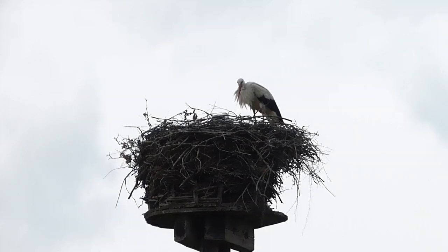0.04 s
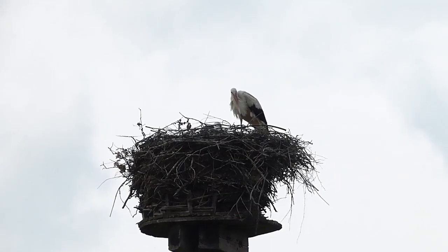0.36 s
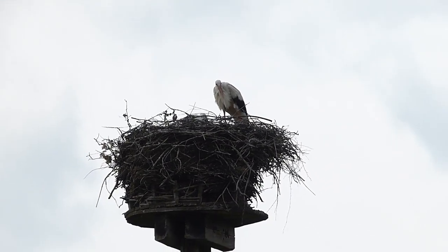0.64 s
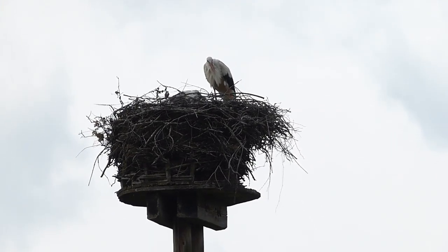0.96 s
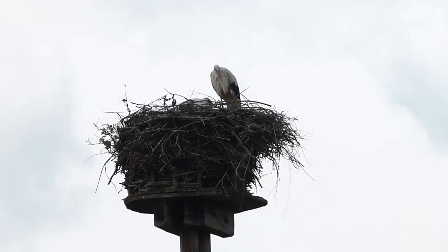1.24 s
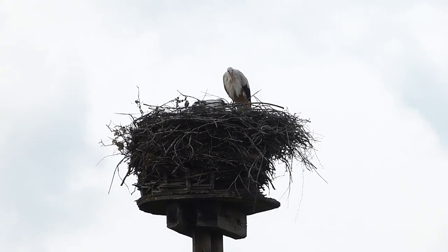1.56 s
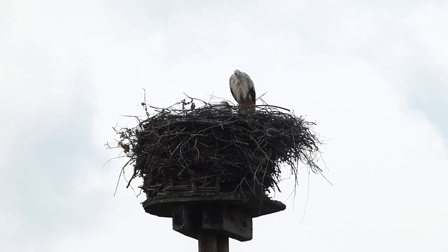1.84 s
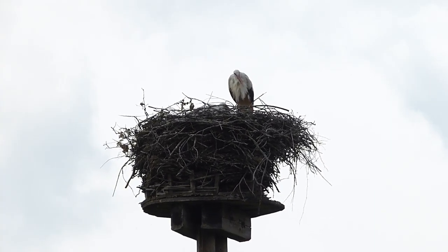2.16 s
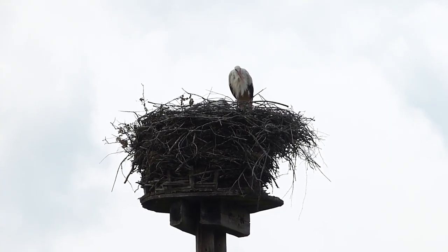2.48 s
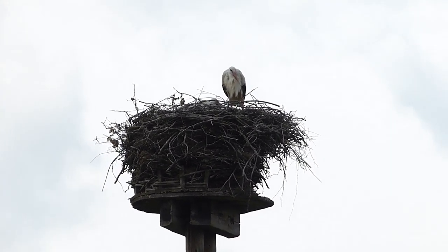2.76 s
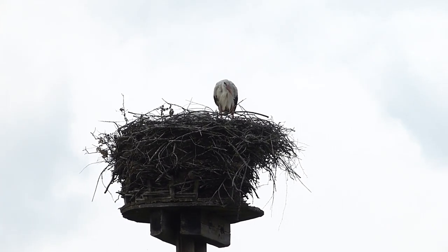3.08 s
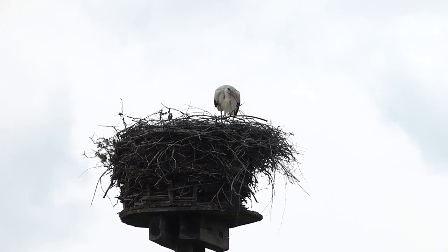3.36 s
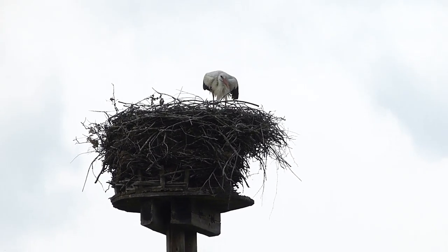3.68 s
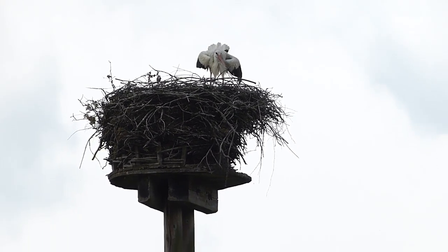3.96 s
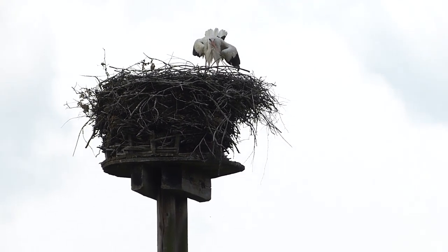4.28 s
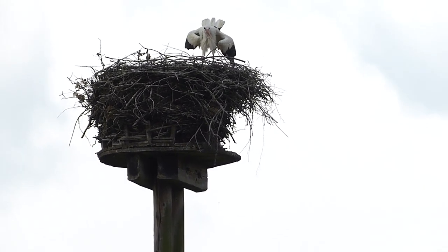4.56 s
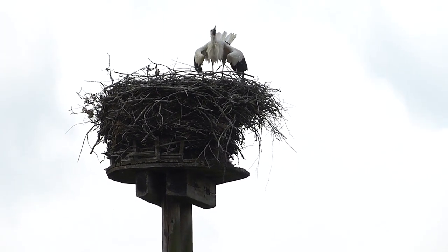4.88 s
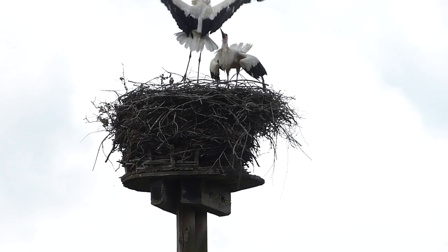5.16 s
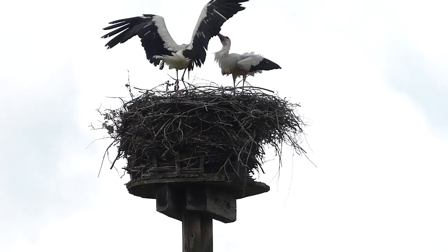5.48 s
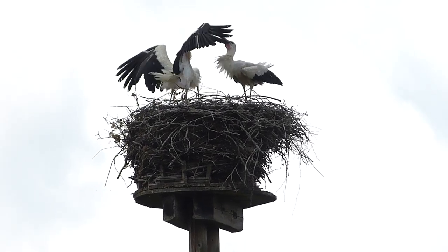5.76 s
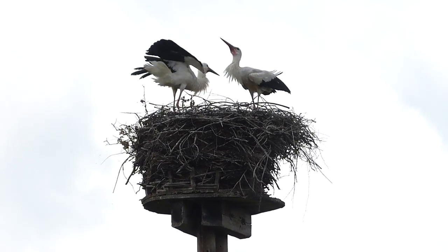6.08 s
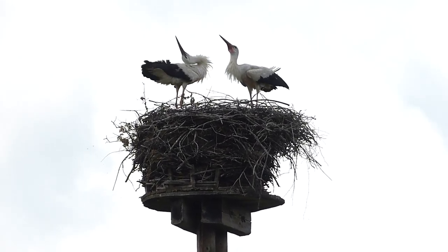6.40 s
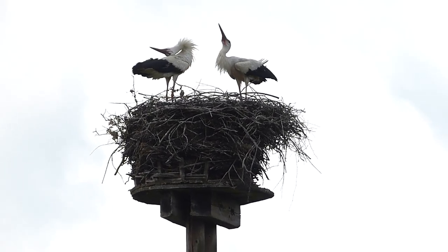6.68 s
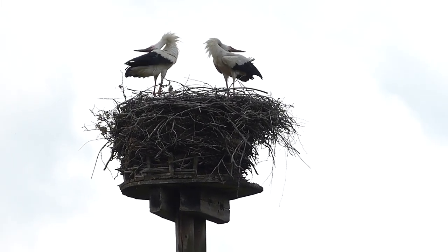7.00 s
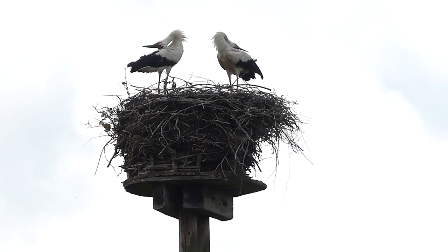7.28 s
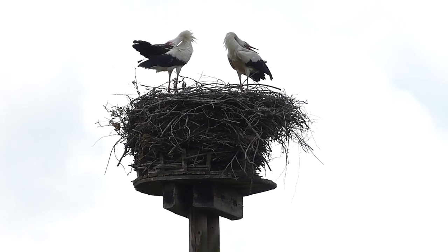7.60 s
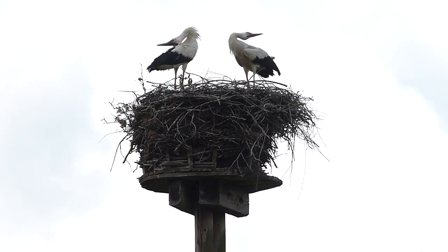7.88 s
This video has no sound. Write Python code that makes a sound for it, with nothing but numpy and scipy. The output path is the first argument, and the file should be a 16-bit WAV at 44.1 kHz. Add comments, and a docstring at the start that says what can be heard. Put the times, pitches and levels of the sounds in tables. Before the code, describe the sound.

Sparrows chirp in a light breeze, then one stork starts clacking its bill and a second joins in, both clattering faster.

```python
"""Two white storks clatter their bills on a pole nest: one claps slowly, its mate glides in, both speed up.
Each clack is a double impact of the mandibles with a rebound; it excites damped resonances of the bill
and throat pouch and is reflected by the ground. Sparrows chirp all around in frequency-modulated tones,
other birds whistle and hoot further off, and a light wind rumbles on the microphone."""
import sys
import numpy as np
from scipy import signal
from scipy.fft import rfft, irfft, next_fast_len
from scipy.io import wavfile
from scipy.ndimage import uniform_filter1d

SR = 44100
rng = np.random.default_rng(int(sys.argv[2]) if len(sys.argv) > 2 else 0)


def pcm_store(signal):
    """Save signal as 16-bit PCM."""
    levels = np.round(np.clip(np.atleast_2d(signal), -1, 1) * 32767)
    wavfile.write(sys.argv[1], SR, levels.astype(np.int16).T)


N = 358974

# Claps of the stork on the nest, 7 a second, then 12: t/s, touch to closure/ms, closure to rebound/ms,
# touch-to-closure force ratio, throat f/Hz, upper resonance f/Hz,
# then level/dB of pouch, throat, upper resonance, horn and crack (energy over 10 ms, before reflections)
HOST_CLAPS = [(3.131, 1.72, 1.4, 0.83, 1450, 2000, -46.5, -37, -43.5, -58, -53.5),
              (3.3949, 1.66, 2.6, 1.8, 1390, 1990, -46, -39.5, -38, -58.0, -58.5),
              (3.5402, 1.59, 1.38, 1.4, 1470, 1880, -44.5, -35.5, -38.5, -43, -55),
              (3.6864, 1.68, 2.5, 1.5, 1440, 1950, -43.5, -35, -38, -40, -47.5),
              (3.8345, 1.7, 2.37, 1.3, 1420, 1910, -47, -37.5, -40, -42.0, -44.5),
              (3.982, 1.63, 2.31, 1, 1500, 1900, -48, -35.5, -43, -41.5, -43.0),
              (4.1266, 1.75, 1.3, 0.53, 1323.0, 1960, -47.5, -39.0, -40.5, -42.0, -41.5),
              (4.2695, 1.62, 2.29, 0.56, 1482.0, 1796.0, -48.5, -39, -44.5, -44.5, -46.5),
              (4.4088, 1.87, 1.14, 2.4, 1330, 1850, -48, -39.5, -48, -50, -46.5),
              (4.5499, 1.8, 1.16, 1.5, 1420, 1850, -46.5, -37.0, -43, -48, -50),
              (4.6859, 1.55, 2.21, 0.98, 1460, 1920, -46, -37, -44, -45.5, -46.5),
              (4.8275, 1.59, 1.57, 0.36, 1440, 2070, -45.5, -36.5, -40.5, -48, -48),
              (4.9692, 1.74, 2.21, 1.1, 1400, 1940, -47.5, -40, -43.5, -44.5, -46),
              (5.1087, 1.48, 1.45, 0.82, 1610, 2110, -43.5, -36.5, -39, -60.0, -47.5),
              (5.2368, 1.53, 1.9, 0.74, 1530, 2184, -43.5, -39.5, -40.5, -47, -46.0),
              (5.3774, 1.57, 1.3, 0.27, 1544, 2130, -45.0, -40.5, -45.0, -58.0, -59),
              (5.5176, 1.4, 1.26, 0.34, 1603.0, 2138.0, -48, -48.5, -56.5, -60, -56.5),
              (5.6826, 1.42, 1.35, 0.16, 1575, 2141.0, -46.5, -39, -45.0, -60.5, -47),
              (5.8166, 1.33, 1.4, 0.14, 1675, 2300, -44.0, -38, -51, -65.0, -52),
              (5.9503, 1.46, 1.33, 0.35, 1645, 2340, -47, -40.5, -41.0, -45, -49.5),
              (6.0712, 1.7, 1.33, 0.29, 1660, 2400, -48.0, -39.5, -39, -67, -48.0),
              (6.1843, 1.7, 1.33, 0.19, 1660, 2340, -49.5, -38, -40.5, -67, -54.5),
              (6.2803, 1.65, 1.25, 0.44, 1660, 2070.0, -53.0, -42.5, -47, -65.0, -52.5),
              (6.3612, 1.23, 1.57, 0.05, 1680, 2215.0, -51.5, -43, -48.5, -67, -50),
              (6.4424, 1.6, 1.4, 0.082, 1760, 2440, -47.5, -39, -41.5, -65.0, -45.5),
              (6.5242, 1.3, 1.1, 0.2, 1670, 2420, -49, -41, -42.5, -65.0, -60),
              (6.6045, 1.39, 1.17, 0.56, 1620, 2300, -47, -39, -40.5, -64.0, -50.5),
              (6.6863, 1.54, 2.3, 0.16, 1550, 2300, -49, -37.5, -37.0, -63.0, -53),
              (6.768, 1.57, 1.38, 0.16, 1594, 2300, -46, -35, -36.5, -65.0, -49.5),
              (6.8508, 1.69, 1.38, 0.17, 1580, 2260, -45.5, -34, -36, -65, -46.5),
              (6.9336, 1.75, 1.4, 0.15, 1562.0, 2270, -48.5, -35.5, -38, -62.5, -46.5),
              (7.0185, 1.74, 1.5, 0.17, 1566, 2243.0, -47, -35, -38.5, -61.5, -45),
              (7.1038, 1.57, 1.37, 0.24, 1570, 2220, -47.5, -36.5, -40, -57.5, -44),
              (7.1887, 1.6, 1.48, 0.17, 1560, 2104.0, -47.5, -37, -43.0, -62.5, -44.5),
              (7.2731, 1.4, 2.02, 0.49, 1640, 2142.0, -48, -35.5, -42, -64.5, -44.5),
              (7.3567, 1.58, 1.37, 0.2, 1580, 2184.0, -47.5, -33.5, -39, -65.0, -43.5),
              (7.4442, 1.5, 1.16, 0.18, 1570, 2090, -46.5, -32.5, -37.0, -59.5, -43.5),
              (7.5363, 1.35, 1.18, 0.14, 1578.0, 2150, -46, -33.0, -38, -65.0, -45.5),
              (7.6281, 1.45, 1.16, 0.14, 1576, 2108.0, -48.5, -34.5, -37.0, -64.5, -44.5),
              (7.7201, 1.5, 2.02, 0.62, 1590, 2280, -46, -38.5, -36.5, -62.5, -39.5),
              (7.8097, 1.8, 1.4, 0.2, 1550, 2297.0, -54.5, -53.5, -60.5, -57, -51),
              (7.9035, 1.6, 1.3, 0.16, 1545, 2170, -49.5, -36.5, -42.5, -67, -46),
              (7.9979, 1.73, 1.3, 0.21, 1560, 2065.0, -49, -35, -41.5, -69, -44.5),
              (8.0953, 1.4, 2.2, 0.29, 1586.0, 2200, -48.5, -35, -42, -60, -44)]
# Its posture as it bows and throws its head back: t/s, pouch f/Hz, cheek f/Hz, cheek level/dB re pouch,
# throat T60/s, upper resonance T60/s, rebound-to-closure force ratio, closure-to-touch crack ratio
HOST_POSTURE = [(3.44, 703, 1033, -3.94, 0.03, 0.022, 0.7, 0.39),
                (4.05, 617.0, 1234, 0, 0.0127, 0.033, 0.4, 1),
                (4.69, 616, 1100, 1.2, 0.028, 0.0216, 0.41, 0.59),
                (5.31, 677, 1020, -14, 0.024, 0.019, 0.34, 0.96),
                (5.94, 660, 847.0, -11, 0.03, 0.0062, 0.5, 0.81),
                (6.48, 703, 835, -16, 0.017, 0.0084, 0.45, 1),
                (7.06, 673, 820, -15, 0.025, 0.0082, 0.33, 0.97),
                (7.769, 715, 810, -4, 0.017, 0.0098, 0.11, 0.73)]
# The mate's claps, 7 to 10 a second, and posture, in the same columns:
# a hollow double knock turns into one bright snap as its head goes back
MATE_CLAPS = [(5.6991, 1.4, 1.39, 1.28, 1785.0, 1880, -53, -52.0, -47.0, -47.5, -51),
              (5.8392, 1.42, 2.4, 0.58, 1724.0, 1830, -49, -52, -46.5, -48.5, -53),
              (5.9749, 1.43, 1.3, 0.17, 1670, 1827.0, -46.5, -45.5, -43.5, -42, -48),
              (6.118, 1.34, 2, 0.47, 1700, 1820, -44.5, -48, -39.5, -40, -46),
              (6.2576, 1.45, 2.28, 0.45, 1730, 1835.0, -43, -44, -43.5, -42, -47.5),
              (6.3967, 1.3, 2.2, 0.42, 1720, 1800, -44, -42.5, -41.5, -42.5, -47.5),
              (6.5387, 1.34, 2.12, 0.5, 1740, 1833.0, -44.0, -44, -42, -42.0, -46),
              (6.6787, 1.3, 1.8, 0.85, 1762.0, 1840, -43, -55, -38, -44, -44.5),
              (6.8088, 1.3, 1.1, 0.61, 1693.0, 1920, -43.0, -52, -37, -40.5, -43),
              (6.9206, 1.2, 1.26, 0.3, 1658.0, 1969.0, -51, -50.5, -39.5, -44, -48),
              (7.2032, 0.46, 1.04, 0.45, 1650, 2280, -54.5, -40, -41.5, -63.0, -37.5),
              (7.3062, 0.42, 1.5, 2, 1700.0, 2430, -54.5, -42.0, -42, -50, -37.5),
              (7.4084, 0.39, 1.5, 1.48, 1650, 2421.0, -54.5, -40.5, -42.5, -49, -38.5),
              (7.5123, 0.48, 1.94, 0.81, 1668.0, 2390, -55, -40.5, -44, -43, -40.5),
              (7.6171, 0.44, 1.3, 0.92, 1709.0, 2520, -54, -40.5, -42.5, -58.0, -39.5),
              (7.7224, 0.47, 1.2, 0.48, 1575, 2370, -53.5, -38, -47, -63, -40),
              (7.8297, 0.41, 1.36, 0.64, 1742.0, 2501.0, -52, -41, -46, -63.0, -37),
              (7.9438, 0.4, 1.3, 0.83, 1920, 2450, -53, -42.5, -46, -67, -35),
              (8.0631, 0.44, 2.5, 0.62, 1900, 2474.0, -52.5, -39.5, -44.5, -63, -35.5)]
MATE_POSTURE = [(5.91, 677, 858.0, -12, 0.024, 0.024, 0.18, 0.61),
                (6.8, 687, 840, -2.5, 0.0172, 0.0146, 0.02, 2.1),
                (7.2, 743.0, 884, 8, 0.0193, 0.004, 0.32, 0.12),
                (7.95, 735, 1030, 8, 0.011, 0.021, 0.17, 0.25)]


def storks():
    """Direct sound from the nest is followed by early scattering and a faint reverberant tail."""
    nest = clatter(HOST_CLAPS, HOST_POSTURE) + clatter(MATE_CLAPS, MATE_POSTURE) + twigs()
    direct = microphone_pair(nest)
    early = scatter(butter(direct, 1800, "high"), t60=.03, dull_hz=6000, build_s=.0005)
    late = scatter(direct, t60=.5, dull_hz=3500, build_s=.004)
    return direct + from_db(-18.5) * early + from_db(-22.5) * late


def clatter(claps, postures):
    """An impact train drives resonators whose tuning and damping follow the posture of the neck."""
    out = np.zeros(N)
    for s, *clap in claps:
        add(out, s, clack(clap, curve(postures, s)))
    return out


# Modes of the bill's horn: f/Hz, signed relative amplitude, T60/s
HORN_MODES = [(2533, 1, 0.027), (3024, -0.13, 0.012)]


def clack(clap, posture):
    """Impact excitation: the mandibles touch, close and rebound, ringing cavities, horn and bill edges."""
    gap_ms, rebound_ms, touch_force, throat_hz, upper_hz, *levels_db = clap
    pouch_hz, cheek_hz, cheek_db, throat_t60, upper_t60, rebound_force, closing_crack = posture
    t = np.arange(2048) / SR
    onsets_ms = (0, gap_ms, gap_ms + rebound_ms)
    touch, closure, rebound = [contact(t - ms / 1000, grit=.015, fade_s=.0015) for ms in onsets_ms]
    force = touch_force * touch + closure + rebound_force * rebound
    pouch = unit_band(ring(force, pouch_hz, t60=.02), 500, 1100)
    cheek = unit_band(ring(force, cheek_hz, t60=.027), 650, 1500)
    throat = unit_band(ring(force, throat_hz, throat_t60), 1000, 3200)
    upper = unit_band(ring(force, upper_hz, upper_t60), 1500, 3300)
    horn = unit_band(sum(gain * ring(force, hz, t60) for hz, gain, t60 in HORN_MODES), 2100, 3600)
    # the hard edges give a bright crack with one thin ring
    edge_force = contact(t, grit=.037, fade_s=.003) + closing_crack * closure
    edges = rms_one(edge_force) + from_db(-14) * ring(edge_force, hz=4090, t60=.026)
    crack = rms_one(butter(butter(edges, 3640, "high", order=3), 7600, "low", order=4))
    parts = np.array([pouch + from_db(cheek_db) * cheek, throat, upper, horn, crack])
    to_10_ms = np.sqrt(SR / 100 / len(t))
    return ground_echo(from_db(levels_db) @ parts) * to_10_ms


def contact(t, grit, fade_s):
    """A hard contact force is an impulse followed by an exponentially decaying rasp."""
    force = grit * rng.standard_normal(len(t)) * np.exp(-np.maximum(t, 0) / fade_s) * (t >= 0)
    force[np.argmax(t >= 0)] += 1
    return force


def ring(force, hz, t60, detune=.0064):
    """Response of a damped oscillator, tuned slightly differently at every blow; rms 1."""
    radius = from_db(-60 / (max(t60, .002) * SR))
    angle = 2 * np.pi * hz * (1 + detune * rng.normal()) / SR
    return rms_one(signal.lfilter([1, 0, -1], [1, -2 * radius * np.cos(angle), radius ** 2], force))


def ground_echo(x, delay_s=.0044, gain=.15, dull_hz=2500):
    """Reflection: the ground adds a delayed, duller copy that interferes with the direct sound."""
    samples = np.arange(len(x))
    delayed = np.interp(samples - delay_s * SR, samples, x, left=0)
    return x + gain * butter(delayed, dull_hz, "low", order=1)


# Twigs snapping in the nest: t/s, level/dB (rms over 10 ms)
TWIG_SNAPS = [(2.7856, -60), (4.6323, -46.5)]


def twigs():
    """Brittle fracture: each snap is a thin, dry transient without a ring."""
    out, t = np.zeros(N), np.arange(SR // 100) / SR
    for s, db in TWIG_SNAPS:
        snap = contact(t, grit=.45, fade_s=.0012)
        add(out, s, from_db(db) * unit_band(snap, 3500, 9000, order=4))
    return out


# Response of the microphone pair towards the nest: f/Hz, left level/dB re right, left phase lead/rad
PAIR_RESPONSE = [(450, 0, 1.2), (700, 1, .9), (1050, 1.5, .6), (1400, -1.2, .35), (1950, -2.5, .45),
                 (2700, -1.2, .45), (3200, 3.5, .4), (3700, -1.8, -.15), (4900, -2, .15), (5600, 2.5, .15),
                 (6500, -2, -.25), (8500, -2, 0), (12000, 0, 0)]


def microphone_pair(x):
    """Phase and level differences give direction: the left leads in the bass, and the balance ripples."""
    size = next_fast_len(N + SR // 10)
    left_db, lead = curve(PAIR_RESPONSE, np.arange(size // 2 + 1) * SR / size)
    log_ratio = np.log(from_db(left_db)) + 1j * lead
    side = irfft(rfft(x, size) * np.tanh(log_ratio / 2), size)[:N]
    return x + side * [[1], [-1]]


# Sparrow chirps: t/s and f/Hz at the turn from buzz to whistle, whistle base level/dB, buzz base level/dB
CHIRPS = [(0.331, 3960, -56.5, -57), (0.492, 4130, -56, -58), (0.773, 3860, -54, -48.5),
          (0.867, 3980, -54, -51.5), (1.064, 3630, -52.5, -53.5), (1.133, 3890, -56, -55.5),
          (1.23, 3610, -58.5, -61), (1.362, 3940, -57, -59), (1.575, 3930, -59, -53.5),
          (1.93, 3950, -57, -65), (2.046, 3795, -52.5, -53), (2.113, 3637, -57.5, -59),
          (2.189, 3980, -59.5, -64), (2.518, 3970, -56.5, -56.5), (2.861, 3950, -57.5, -53.5),
          (3.46, 3780, -55.5, -51.5), (3.625, 3770, -54, -53), (3.661, 3670, -54.5, -53),
          (3.765, 3730, -59, -53.5), (4.285, 4200, -57.0, -57), (4.357, 4230, -57, -59),
          (4.414, 3790, -51.5, -53.5), (4.799, 3930, -58, -58), (5.035, 3840, -56.1, -62),
          (5.365, 3790, -58, -52), (5.99, 4100, -53, -49.5), (6.385, 3840, -54.5, -55),
          (6.643, 3830, -53.6, -55.0), (6.825, 3870, -54.5, -60), (7.354, 4390, -56, -55),
          (7.401, 4060, -53, -58), (7.505, 3810, -51.5, -52), (7.756, 3760, -54, -53)]
# Contour of the buzz: t/s from the turn, f/Hz, relative level/dB
BUZZ_CONTOUR = [(-.06, 4500, -16), (-.045, 4820, -4), (-.02, 5250, -7), (-.003, 5470, -62)]
# Contour of the whistle: t/s from the turn, frequency ratio to the turn, relative level/dB
WHISTLE_CONTOUR = [(-.016, .87, -7), (0, 1, -0.5), (.014, .87, -5.5), (.035, .76, -7.5), (.06, .68, -9.5),
                   (.08, .63, -20)]


def sparrows(warble_hz=660, swing_rms_hz=560, buzz_gain_db=2.0, whistle_gain_db=3.5):
    """Frequency modulation: a rising, fast-warbled buzz turns into a rough falling whistle."""
    out, t = np.zeros((2, N)), np.arange(-.07, .09, 1 / SR)
    for s, turn_hz, whistle_db, buzz_db in CHIRPS:
        size, pace, side, depth = rng.normal(0, 1, 4)  # no two chirps are alike
        hoarse = 1 + .048 * drift(1300, len(t)) + .015 * drift(120, len(t))
        hz, db = curve(BUZZ_CONTOUR, t)
        warble = swing_rms_hz * tone(warble_hz * (1 + .0924 * side + .242 * drift(399.4, len(t))))
        buzz = tone(hz * (1 + .0242 * size) * np.sqrt(hoarse) + warble)
        buzz *= from_db(db + buzz_db + buzz_gain_db) * (t > BUZZ_CONTOUR[0][0]) * (t < BUZZ_CONTOUR[-1][0])
        ratio, db = curve(WHISTLE_CONTOUR, t * (1 + .1084 * pace))
        # the whistle is harsh at the turn and clears as it falls
        harsh = 1 + np.interp(t, [0, .04], [.045, .008]) * drift(700, len(t))
        flutter_db = 1.6 * drift(150, len(t))
        whistle = tone(turn_hz * ratio ** (1 + .0509 * depth) * hoarse * harsh)
        whistle *= from_db(db + whistle_db + whistle_gain_db + flutter_db) * (t > WHISTLE_CONTOUR[0][0])
        chirp = (buzz + whistle) * signal.windows.tukey(len(t), .1)
        add(out, s + t[0], pan(chirp, left_db=-1.6 + side / 2))
    tail = pan(scatter(out, t60=.33, dull_hz=8000, build_s=.001), left_db=-1.5)
    return from_db(-.5) * out + from_db(-6) * tail


# Fluty whistles: t/s, duration/s, start f/Hz, bend f/Hz, end f/Hz, base level/dB
FLUTINGS = [(4.05, .16, 1540, 1770, 1877, -50), (4.365, 0.17, 1990, 2070, 2140, -49.5),
            (4.45, 0.14, 2750, 2493, 2470, -51), (5.1, 0.22, 2140, 2220, 2165, -58),
            (7.18, 0.22, 1950, 1967, 2110, -55.5), (7.625, 0.075, 1850, 1830, 2000, -55),
            (7.845, 0.26, 1770, 1992, 1776, -50)]
# Thin slurs and held notes of small birds, in the same columns
SLURS = [(.403, 0.12, 3265, 3530, 4340, -57), (.715, 0.025, 6000, 6350, 6930, -55),
         (1.385, 0.094, 2850, 3090, 3700, -60), (1.46, 0.046, 3450, 3920, 4400, -51),
         (1.7, 0.034, 4150, 4600, 4650, -63), (1.735, 0.039, 4100, 4480, 4820, -59),
         (2.7, 0.1, 4050, 4170, 4270, -72), (2.79, 0.13, 2650, 2500, 2400, -65),
         (3.08, 0.22, 2480, 2580, 2730, -68), (3.144, 0.075, 3300, 3760, 4360, -59),
         (3.22, 0.11, 2600, 2570, 2500, -67), (4.2, 0.11, 3050, 3450, 4160, -55.5),
         (4.216, 0.044, 5700, 5550, 5350, -57.5), (5.29, 0.044, 5920, 5780, 5200, -56),
         (5.496, 0.073, 4630, 4500, 4240, -56), (5.878, 0.049, 4800, 4650, 4140, -62),
         (5.909, .087, 3110, 3250, 3600, -61), (6.92, 0.046, 3870, 4020, 4760, -53)]


def whistlers():
    """Nearly pure tones of birds in the trees arrive directly and by diffuse scattering."""
    notes = glides(FLUTINGS, bend=.28, waver=.012) + glides(SLURS, bend=.5, waver=.005)
    direct = pan(notes, left_db=-1.4)
    return direct + from_db(-8) * scatter(direct, t60=.42, dull_hz=5000, build_s=.005)


def glides(notes, bend, waver):
    """Glissandi through three pitches, turning at the fraction bend; jitter grows with frequency."""
    out = np.zeros(N)
    for s, length, start_hz, bend_hz, end_hz, db in notes:
        size = int(length * SR)
        contour = np.interp(np.linspace(0, 1, size), [0, bend, 1], [start_hz, bend_hz, end_hz])
        jitter = 1 + waver * (start_hz / 2000) ** 2 * drift(666, size)
        hz = uniform_filter1d(contour, size // 4) * jitter
        envelope = signal.windows.tukey(size, .4) * from_db(db - .5 + 1.6 * drift(70, size))
        add(out, s, tone(hz) * envelope)
    return out


def far_hoot(t, start_s=.93, end_s=1.5, attack_s=.15, release_s=.035, rise_hz_per_s=55, db_per_s=10.5):
    """Two harmonics, hoarse with frequency jitter, swell and rise a little, blurred by reverberation."""
    since = t - start_s
    gate = np.clip(since / attack_s, 0, 1) * np.clip((end_s - t) / release_s, 0, 1)
    hz = (821 + rise_hz_per_s * since) * (1 + .055 * drift(220, N))
    swell = from_db(-65 + db_per_s * since + 2.5 * drift(45, N))
    call = pan((tone(hz) + from_db(-14) * tone(2 * hz)) * gate * swell, left_db=-.3)
    return call + from_db(-3) * scatter(call, t60=.4, dull_hz=3000, build_s=.004)


# Strength of the far flock's chirps by pitch: f/Hz, relative level/dB
FLOCK_SPECTRUM = [(2000, -25), (2800, -5), (3900, 0), (4700, -3), (6000, -12), (8000, -28)]
# Envelope of the flock: t/s, level/dB
FLOCK_LEVEL = [(0, -56), (.7, -57), (1.2, -61), (1.8, -68), (2.5, -72), (3.0, -60.5), (3.7, -60),
               (4.5, -68), (5.3, -54), (5.7, -64.5), (6.2, -53), (7.0, -65), (8.14, -57.5)]


def far_flock(t, count=3600, length_s=.0464, jitter=.0793, spread_db=24):
    """Incoherent summation: many distant chirps blur into a twitter."""
    out, progress = np.zeros(N), np.linspace(0, 1, int(length_s * SR))
    for when, pitch, slope, faintness in rng.random((count, 4)):
        hz = 2600 * 2.3 ** pitch
        glide = hz * (1 + .304 * (slope - .6) * progress + jitter * drift(868, len(progress)))
        gain = from_db(at_hz(FLOCK_SPECTRUM, hz) - spread_db * faintness)
        add(out, when * N / SR, tone(glide) * np.hanning(len(progress)) * gain)
    twitter = rms_one(out + scatter(out[None], t60=.052, dull_hz=8140, build_s=.00091))
    return gain_at(FLOCK_LEVEL, t) * twitter


# Spectral density of rustling wings and twigs: f/Hz, relative level/dB
RUSTLE_SPECTRUM = [(500, -58), (1400, 17), (2600, 12), (4500, 8), (8000, 4.5), (11000, -46), (16000, -52)]
# Envelope of the rustle: t/s, level/dB
RUSTLE_LEVEL = [(0, -89), (3.1, -70), (3.6, -58), (4.1, -57.5), (4.6, -56.5), (5.2, -56), (5.7, -64.5),
                (6.1, -60), (6.8, -57.5), (7.4, -61), (8.1, -59.5)]


def rustle(t):
    """Friction noise of wings and twigs, its bands rapidly modulated in amplitude."""
    return gain_at(RUSTLE_LEVEL, t) * noise_field(RUSTLE_SPECTRUM, AIR_WIDTH, flicker_db=3, flicker_hz=60)


def wing_rush(t, peak_s=5.1, width_s=.61, peak_db=-75):
    """Flow noise: air hisses through the mate's feathers, swelling and fading as it glides in."""
    mid, side = unit_band(rng.standard_normal((2, N)), 6500, 11500, order=6)
    swell = np.exp(-((t - peak_s) / width_s) ** 2 / 2) * from_db(peak_db + 1.8 * drift(36, N))
    return swell * (mid + .75 * side * [[1], [-1]])


# Spectral density of wind on the microphone: f/Hz, relative level/dB
WIND_SPECTRUM = [(30, -5), (55, -23.5), (85, 4.5), (125, 3.5), (185, -7.5), (260, -5.5), (350, -26),
                 (600, -45.5)]
# A light breeze that dies down: t/s, level/dB
BREEZE_LEVEL = [(0, -66), (2.8, -66.5), (3.5, -71.5), (3.9, -65), (4.8, -88), (8.14, -80)]
# Peaks of the puffs: t/s, level/dB
PUFFS = [(0.47, -61), (0.581, -59.5), (0.978, -46.5), (1.04, -59), (1.09, -53.5), (2.975, -54),
         (3.029, -58), (3.08, -52.5), (3.185, -54), (3.28, -55), (3.8, -61), (3.921, -61), (4.05, -59.5),
         (4.44, -58.5), (8.02, -71)]
# Puffs strike the two sides mostly in antiphase: f/Hz, side level/dB re mid
PUFF_WIDTH = [(50, 0), (85, 5), (130, 15), (260, 13), (500, 6)]


def wind(t, attack_s=.017, release_s=.033):
    """Turbulent pressure rumbles on the microphone: a breeze, and brief puffs that add in power."""
    breeze = gain_at(BREEZE_LEVEL, t) * noise_field(WIND_SPECTRUM, AIR_WIDTH, flicker_db=0, flicker_hz=10)
    power = 0
    for s, db in PUFFS:
        time_constants = np.maximum((s - t) / attack_s, (t - s) / release_s)
        power += (from_db(db) * np.exp(-np.minimum(time_constants, 20))) ** 2
    return breeze + np.sqrt(power) * noise_field(WIND_SPECTRUM, PUFF_WIDTH, flicker_db=.5, flicker_hz=22)


# Spectral density of the open air: f/Hz, relative level/dB
AIR_SPECTRUM = [(120, -4.5), (200, -3.5), (254, -5), (448, -3), (806, 3), (1020, -1), (1710, -2.5),
                (2290, -6), (2750, -20.5), (3620, -13), (4040, -7), (12800, -23), (14900, -43),
                (16000, -52)]
# Stereo width of the ambient field: f/Hz, side level/dB re mid
AIR_WIDTH = [(45, -7), (100, -3), (150, 2), (230, 6), (320, 7), (500, 4), (1000, 0), (2000, -3),
             (4000, -5.5), (8000, -4), (15000, -2)]


def open_air():
    """Ambient noise: a broadband floor that flickers slightly about a steady level."""
    return from_db(-59.5) * noise_field(AIR_SPECTRUM, AIR_WIDTH, flicker_db=1.5, flicker_hz=14)


def noise_field(spectrum, width, flicker_db, flicker_hz):
    """Half-octave bands of stereo noise with independent amplitude modulation; the mid has rms 1."""
    out, edges = 0, 31 * 2 ** np.arange(0, 9.1, .5)
    white = rng.standard_normal((2, 2, N))
    for k, (low, high) in enumerate(zip(edges, edges[1:])):
        mid, side = butter(white[k % 2], [low, high], "band")
        hz = np.sqrt(low * high)
        side_gain = from_db(at_hz(width, hz))
        gain = from_db(at_hz(spectrum, hz) + flicker_db * drift(flicker_hz, N))
        out = out + gain * (mid + side_gain * side * [[1], [-1]])
    return out / np.std(out.mean(axis=0))


def scatter(x, t60, dull_hz, build_s):
    """Diffuse scattering by trees and buildings: a decaying tail, partly coherent between the ears."""
    t = np.arange(SR) / SR
    mid, side = rng.standard_normal((2, SR)) * from_db(-60 * t / t60) * (1 - np.exp(-t / build_s))
    tail = mid + .55 * side * [[1], [-1]]
    tail = rms_one(butter(tail, dull_hz, "low", order=1)) / np.sqrt(SR)
    return signal.fftconvolve(x.mean(axis=0)[None], tail, axes=1)[:, :N]


def from_db(db):
    """Level to amplitude ratio."""
    return 10 ** (np.asarray(db) / 20)


def rms_one(x):
    """Normalisation to an rms of 1."""
    return x / np.sqrt(np.mean(x ** 2) + 1e-20)


def curve(rows, at):
    """Linear interpolation of a table's other columns along its first."""
    axis, *columns = np.transpose(rows)
    return [np.interp(at, axis, column) for column in columns]


def gain_at(levels, t):
    """Amplitude envelope from a table of levels."""
    return from_db(curve(levels, t)[0])


def at_hz(spectrum, hz):
    """Interpolation on a logarithmic frequency axis."""
    frequencies, levels = np.transpose(spectrum)
    return np.interp(np.log(hz), np.log(frequencies), levels)


def add(out, s, x):
    """Superposition of a short sound at time s."""
    i = max(int(round(s * SR)), 0)
    out[..., i:i + x.shape[-1]] += x[..., :max(N - i, 0)]


def butter(x, hz, kind, order=2):
    """Causal Butterworth filter."""
    return signal.sosfilt(signal.butter(order, np.clip(hz, 10, .45 * SR), kind, fs=SR, output="sos"), x)


def unit_band(x, low_hz, high_hz, order=2):
    """Band-pass filtering, normalised to an rms of 1."""
    return rms_one(butter(x, [low_hz, high_hz], "band", order))


def drift(rate_hz, size):
    """Smooth random modulation with a spread near 1."""
    knots = rng.standard_normal(2048)
    return np.interp(np.arange(size) / SR * rate_hz, np.arange(len(knots)), knots)


def tone(hz):
    """A sine of rms 1 whose phase is the integral of its frequency."""
    return np.sqrt(2) * np.sin(2 * np.pi * np.cumsum(hz) / SR)


def pan(x, left_db):
    """A level difference places a sound between the ears."""
    return x * from_db([[left_db / 2], [-left_db / 2]])


def scene():
    """Superposition of storks and other birds on open air, rustle, a far flock, wing hiss and wind."""
    t = np.arange(N) / SR
    ambient = open_air() + rustle(t) + far_flock(t) + wing_rush(t)
    background = pan(ambient, left_db=-1.3) + pan(wind(t), left_db=-2.8)
    return storks() + sparrows() + whistlers() + far_hoot(t) + background


def record(dry, start_s=.207, dc_offset=-.003, cutoff_hz=16000):
    """Gating and band limiting: the sound opens after a moment, slightly offset, with its top cut."""
    gate = np.clip((np.arange(N) / SR - start_s) / .002, 0, 1)
    low_pass = signal.ellip(10, .1, 80, cutoff_hz, fs=SR, output="sos")
    return signal.sosfilt(low_pass, (dry + dc_offset) * gate)


dry = scene()
out = record(dry)
pcm_store(out)
```